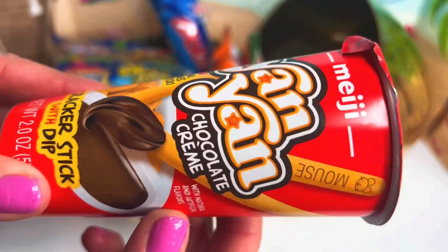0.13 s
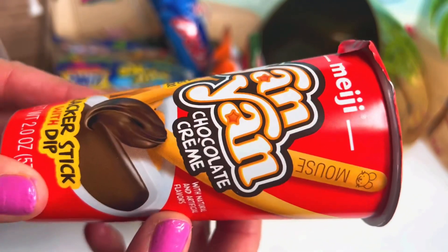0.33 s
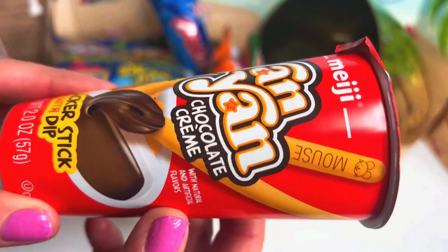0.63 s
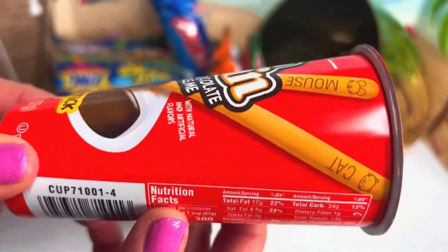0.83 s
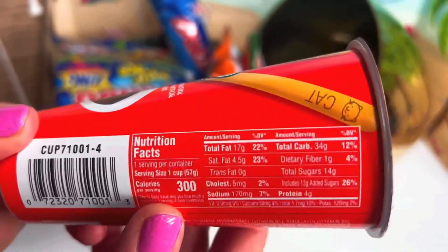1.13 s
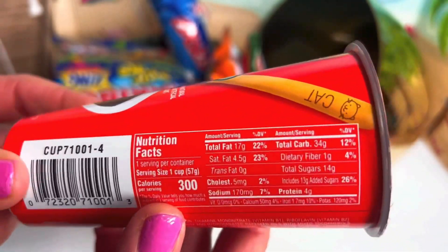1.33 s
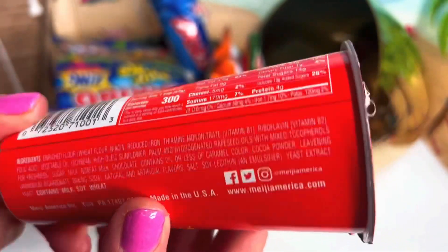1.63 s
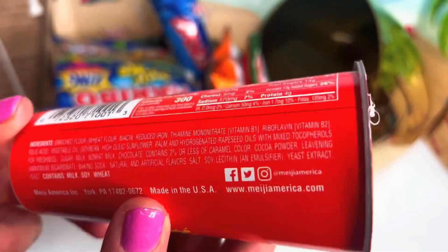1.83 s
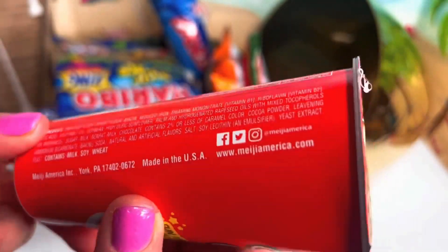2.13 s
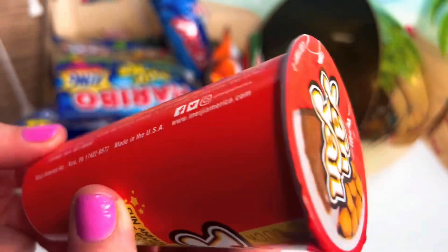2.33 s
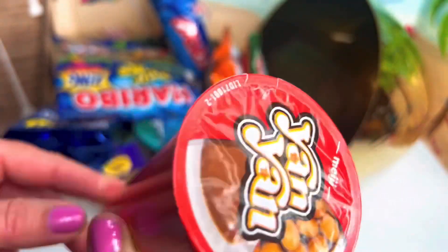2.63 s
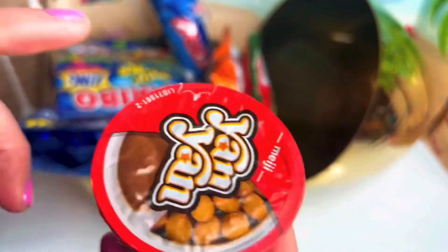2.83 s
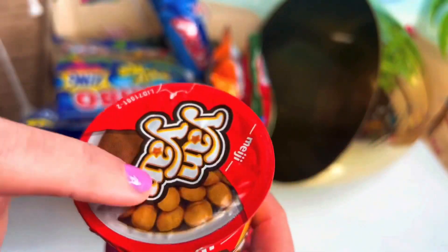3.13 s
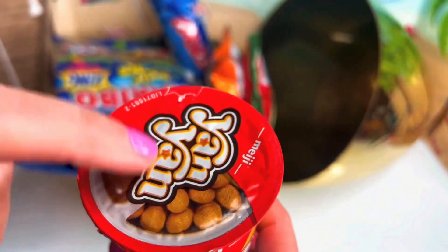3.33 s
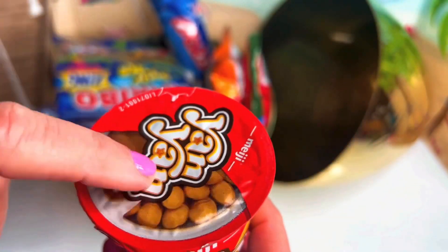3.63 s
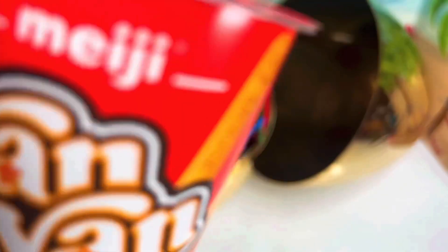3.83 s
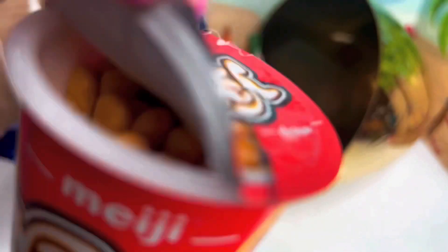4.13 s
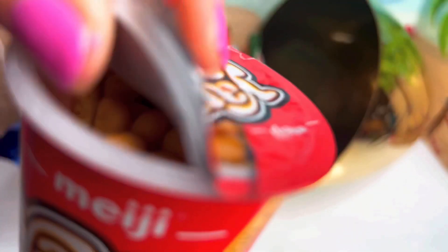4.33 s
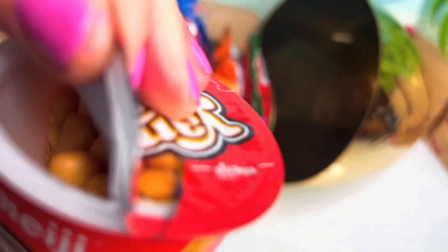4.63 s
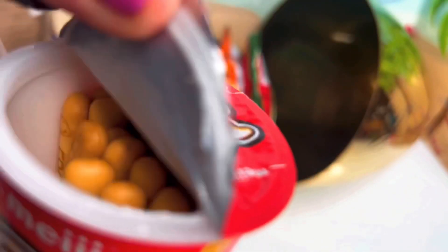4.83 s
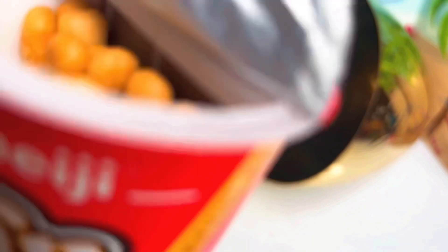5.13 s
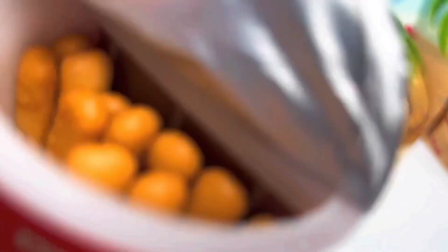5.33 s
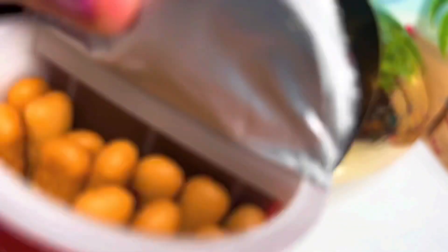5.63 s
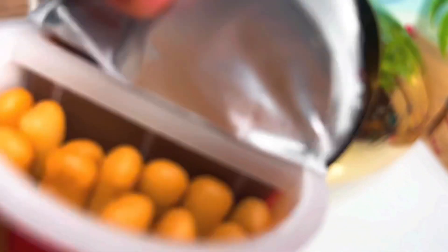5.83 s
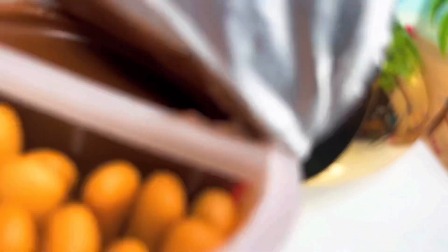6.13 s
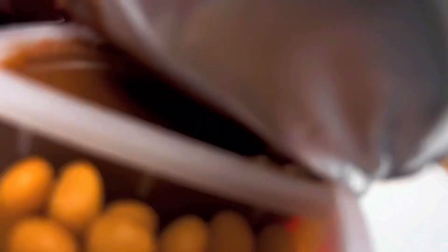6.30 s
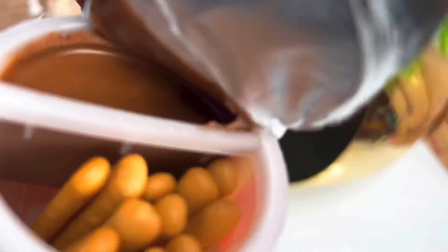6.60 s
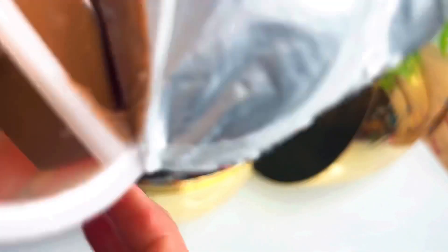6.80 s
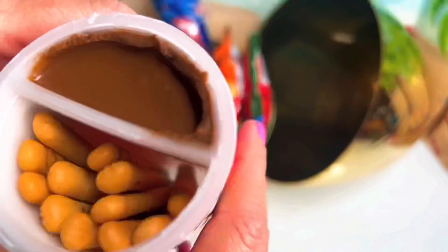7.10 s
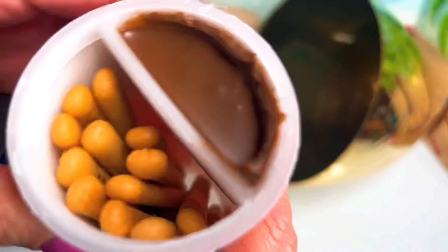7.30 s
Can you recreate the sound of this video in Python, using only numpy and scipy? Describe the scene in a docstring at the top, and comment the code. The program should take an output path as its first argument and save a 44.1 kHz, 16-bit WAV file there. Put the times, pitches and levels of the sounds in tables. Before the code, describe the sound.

Close handling of a small plastic cup: dry skin rubs, a nail tap on foil, then crackly peeling and a loud foil crumple.

```python
"""Fingers turn a lidded plastic snack cup close to a pair of microphones, over a faint low room rumble.
First skin rubs on the cup in dense grains of noise, with snaps made of short noise bursts.
From about 3.1 s a nail taps the foil lid: snaps, low thumps, dying tones and a wash of noise.
From 3.8 s the lid is peeled back and the cup's colour shifts; dense clicks around one pitch come in short bursts.
Around 5.9 s the foil is crumpled loudest; strokes and snaps go on, then thin out after about 7.1 s."""
import sys
import numpy as np
from scipy import signal
from scipy.fft import rfft, irfft, next_fast_len
from scipy.io import wavfile

SR = 44100
rng = np.random.default_rng(int(sys.argv[2]) if len(sys.argv) > 2 else 0)


def wrap_up_sound(samples):
    """Save the sound to the file named by the first command line argument, as 16-bit audio."""
    columns = np.atleast_2d(samples).T
    # keep every value between -1 and 1, then stretch to whole-number steps
    tamed = np.clip(columns, -1, 1)
    steps = np.round(tamed * 32767).astype(np.int16)
    wavfile.write(sys.argv[1], SR, steps)


N = 328986   # length in samples


def amp(db):
    """Turn decibels into a gain."""
    return 10 ** (np.asarray(db) / 20)


def rms_one(x):
    """Scale a signal to an average (rms) strength of 1."""
    return x / np.sqrt(np.mean(x ** 2) + 1e-20)


def in_time(rows):
    """Draw straight lines through (start_s, level_db) points, giving a level for every sample."""
    s, level_db = np.transpose(rows)
    return np.interp(np.arange(N) / SR, s, level_db)


def band(x, low_hz, high_hz, order=2):
    """Keep only the pitches between two limits (Butterworth band-pass)."""
    limits = [low_hz, min(high_hz, .45 * SR)]
    return signal.sosfilt(signal.butter(order, limits, "band", fs=SR, output="sos"), x)


def resonate(x, hz, width_hz):
    """Ring at one pitch, as a two-pole resonance with a gain of 1 at its top; a narrow one rings longer."""
    r = np.exp(-np.pi * width_hz / SR)
    top = np.array([1, 0, -1]) * (1 - r * r) / 2
    return signal.lfilter(top, [1, -2 * r * np.cos(2 * np.pi * hz / SR), r * r], x)


def fade(clicks, t60):
    """Turn each click into a sudden rise and an exponential fall of 60 dB in t60 seconds."""
    return signal.lfilter([1], [1, -amp(-60 / (t60 * SR))], clicks + 1e-18)


def drift(rate):
    """Make a slowly wandering random curve of rms 1; a higher rate (Hz) wanders faster."""
    r = np.exp(-2 * np.pi * rate / SR)
    wander = signal.lfilter([1], [1, -2 * r, r * r], rng.standard_normal(N + SR))
    return rms_one(wander[SR:])   # the first second lets the filter settle


# colour of the room rumble, only its shape counts: pitch_hz [Hz], level_db [dB per Hz]
ROOM_COLOUR = [(15, -49), (25, -14), (124, 20), (288, -10.5), (541, -8), (900, -28), (1170, -55.5)]
RUMBLE_DB = -72   # rms over both channels


def room_tone(likeness):
    """The room rumbles steadily: shaped noise, mostly shared by both microphones."""
    pitch_hz, level_db = np.transpose(ROOM_COLOUR)
    log_hz = np.log(np.fft.rfftfreq(N, 1 / SR) + 1)
    gain = amp(np.interp(log_hz, np.log(pitch_hz), level_db))
    mid, side = irfft(rfft(rng.standard_normal((2, N))) * gain, N)
    alike = np.clip(likeness, 0, 1)
    rumble = np.sqrt(1 + alike) * mid + np.sqrt(1 - alike) * side * [[1], [-1]]
    return amp(RUMBLE_DB) * rms_one(rumble)


ROOM_T60_S = 0.12   # fall of the lowest pitches; higher ones die sooner


def room(x):
    """The room answers through eight feedback delays a side, duller on every round."""
    size = next_fast_len(N + SR)   # spare room at the end for the echoes
    hz = np.fft.rfftfreq(size, 1 / SR)
    spectrum, out = rfft(x, size), np.zeros((2, len(hz)), complex)
    for k, lag in enumerate(rng.uniform(.006, 0.022, 16)):
        dull_hz = 30.8 / lag   # a longer path loses more treble per round
        round_trip = amp(-60 * lag / ROOM_T60_S) * np.exp(-2j * np.pi * hz * lag)
        loop = round_trip / (1 + 1j * hz / dull_hz)
        out[k % 2] += loop / (1 - loop) * (-1) ** (k // 2)
    return irfft(out * spectrum, size)[:, :N]


# difference between the two microphone ports:
# pitch_hz [Hz], left_minus_right_db [dB], left_lead_rad [radians]
PORT_OFFSETS = [(150, 2.5, .4), (900, 5.5, .4), (1300, 7.5, -.8), (2300, 6.5, -.3), (3100, 2.5, .8),
                (6000, 3.5, .2), (7300, 6, .8), (8400, 0, .2), (15300, 0, -12.5)]


def ports(x):
    """A near source reaches the two microphone ports with level and phase offsets that depend on pitch."""
    size = next_fast_len(N + SR // 10)
    hz = np.fft.rfftfreq(size, 1 / SR)
    pitch_hz, balance_db, lead_rad = np.transpose(PORT_OFFSETS)
    balance = amp(np.interp(hz, pitch_hz, balance_db) / 2)
    half = balance * np.exp(.5j * np.interp(hz, pitch_hz, lead_rad))
    return irfft(rfft(x, size) * np.array([half, 1 / half]), size)[:, :N]


# low noise of the hands, before it wavers and reaches the ports: start_s [s], level_db [dB]
HAND_LEVELS = [(0.0, -72), (2.51, -78), (6.71, -59.5), (7.46, -81)]


def hand_rumble():
    """The moving hands make a low noise whose level wavers."""
    level_db = in_time(HAND_LEVELS) + 2 * drift(6.6)
    return amp(level_db) * rms_one(band(rng.standard_normal(N), 50, 200))


def widening_copy(x):
    """A faint copy 1.2 ms late, drifting in strength and opposite in the two channels, widens the sound."""
    late = np.roll(band(x, 250, 4600), round(0.001213 * SR), axis=1)
    return amp(-6.0) * drift(10.4) * late * [[1], [-1]]


# grips and pushes on the cup, levels relative:
# start_s [s, at the height of the swing], level_db [dB], pitch_hz [Hz, once it has sagged]
GRIPS = [(3.105, -46, 116.6), (3.353, -51, 149.3), (3.62, -41.5, 181), (3.633, -48, 87.7),
         (5.291, -48, 231), (5.383, -49.5, 76.4), (5.403, -50.5, 78.3), (5.438, -50.5, 244),
         (5.456, -39, 161.4), (5.474, -45.5, 137), (5.495, -41.5, 218.7), (5.543, -52, 297),
         (5.555, -52, 134), (5.617, -49.5, 347), (5.8, -43, 316), (5.897, -32, 306), (5.926, -41, 68),
         (5.943, -44, 420), (5.957, -56, 98.6), (6.273, -52.5, 64.6), (6.353, -49, 72.8),
         (6.658, -35.5, 198), (6.892, -50.5, 113.4)]


def thumps():
    """The held cup answers a push with a few low cycles; flesh loads it slowly and the pitch sags."""
    out = np.zeros(N)
    for s, level_db, hz in GRIPS:
        rise_s = 0.0034 + 0.5 / hz
        i = round((s - rise_s) * SR)
        t = np.arange(SR // 6) / SR / rise_s   # time counted in rises
        turns = hz * rise_s * (t + 0.21 * (1 - np.exp(-t)))   # starts 21 % sharp
        swing = np.sin(2 * np.pi * turns) * (t * np.exp(1 - t)) ** 2
        out[i:i + len(t)] += amp(level_db + 6.0) * swing[:N - i]
    scuff = rms_one(band(rng.standard_normal(N), 83, 450))   # skin shudders on the wall under load
    return out * (1 + 0.28 * scuff)


# pitch ranges of whatever excites the cup: low_hz [Hz], high_hz [Hz], level_db [dB, relative],
# treble_follow [dB gained per dB of treble share], snap_fall_s [s to fall 60 dB]
RANGES = [(1150, 2540, -0.5, -0.27, 0.02), (2778, 5500, 0, 0.47, 0.022), (6060, 10900, -1.5, 0.92, 0.0092),
          (10200, 13000, -3, 0.93, 0.011)]
# peaks in the cup's colour with its lid on, the widest just brightening the top treble: # pitch_hz [Hz],
# width_hz [Hz], level_db [dB, of the ring added on top of the plain sound]
SEALED_PEAKS = [(773, 98, 1.5), (1620, 500, -4.5), (3390, 110, -0.5), (15000, 1200, 2.5)]
# peaks in the colour once the lid is open, the one near 15 kHz just brightening the top treble: # pitch_hz
# [Hz], width_hz [Hz], level_db [dB, of the ring added on top of the plain sound]
OPEN_PEAKS = [(523, 71, 1), (609, 87, 6.5), (2020, 140, -4), (2986, 530, 0.5), (8170, 680, -4),
              (11900, 330, 0.5), (14900, 870, 12.5)]
OPENING_S = 3.8   # when the lid is opened


def cup(boom, ranges):
    """The cup colours what excites it with resonant peaks, a different set once the lid is open."""
    x = band(boom, 200, 868)
    x += sum(band(part, row[0], row[1]) for part, row in zip(ranges, RANGES))
    opened = np.arange(N) > OPENING_S * SR
    out = x.copy()
    for peaks, part in ((SEALED_PEAKS, x * ~opened), (OPEN_PEAKS, x * opened)):
        for hz, width_hz, level_db in peaks:
            out += amp(level_db) * resonate(part + 1e-18, hz, width_hz)
    return out


# wash after each tap on the lid, levels relative: start_s [s], level_db [dB]
TAP_WASHES = [(3.095, -38), (3.345, -58), (3.614, -52)]
TAIL_BASS_T60_S, TAIL_TREBLE_T60_S = 0.35, 0.28
TAIL_TILT_DB = -4.5   # per range upward


def tap_tails():
    """After a tap on the lid a smooth wash dies away in cup and room, the treble first."""
    s, level_db = np.transpose(TAP_WASHES)
    clicks = np.zeros(N)
    clicks[np.round(s * SR).astype(int)] = amp(level_db)
    t60s = np.geomspace(TAIL_BASS_T60_S, TAIL_TREBLE_T60_S, 1 + len(RANGES))
    parts = []
    for k, t60 in enumerate(t60s):
        parts.append(amp(TAIL_TILT_DB * k) * fade(clicks, t60) * rng.standard_normal(N))
    return cup(parts[0], parts[1:])


# hollow knocks that leave the air in the cup ringing:
# start_s [s], level_db [dB, at the start], pitch_hz [Hz], fall_s [s to fall 60 dB]
AIR_KNOCKS = [(2.794, -46.5, 748, 0.11), (2.82, -38, 760, 0.024), (2.846, -41.5, 713, 0.027),
              (3.0932, -19.5, 880, 0.015), (3.0917, -22.5, 1834, 0.013), (3.611, -33.5, 876, 0.032),
              (4.085, -48.5, 490, 0.083), (4.291, -50.5, 564, 0.15), (5.605, -33.5, 955, 0.026),
              (7.037, -38, 577, 0.045), (7.116, -37.5, 630, 0.041)]


def knocks():
    """Each knock is one dying tone of the cup's air."""
    out, t = np.zeros(N), np.arange(SR // 5) / SR
    for s, level_db, hz, fall_s in AIR_KNOCKS:
        i = round(s * SR)
        tone = amp(level_db - 60 * t / fall_s) * np.sin(2 * np.pi * hz * t)
        out[i:i + len(t)] += tone[:N - i]
    return out


# short bursts of dense clicks around one pitch, some from taps or the cup's body:
# start_s [s], length_s [s], level_db [dB], pitch_hz [Hz]
CLICK_BURSTS = [(3.61, 0.0068, -41.5, 3350), (3.857, 0.13, -69.5, 430), (4.094, 0.036, -48, 3650),
                (5.311, 0.037, -60, 3560), (5.321, 0.037, -61, 1550), (5.434, 0.03, -59, 930),
                (5.918, 0.0063, -30, 1480), (6.081, 0.052, -48.5, 2080), (6.655, 0.047, -45, 2400),
                (6.759, 0.05, -40, 2110), (6.878, 0.065, -44, 2550), (6.924, 0.062, -50.5, 2580)]
BURST_CLICKS_PER_S, BURST_CYCLES = 1100, 3.85   # more cycles make a purer ring


def click_bursts():
    """Dense clicks of uneven size swell and die while they ring around one pitch."""
    out, t = np.zeros(N), np.arange(SR // 8) / SR
    for s, length_s, level_db, hz in CLICK_BURSTS:
        clicks = (rng.random(len(t)) < BURST_CLICKS_PER_S / SR) * rng.laplace(size=len(t))
        clicks = clicks * np.sin(np.pi * np.minimum(t / length_s, 1))
        ring = resonate(clicks, hz, hz / BURST_CYCLES)
        ring = resonate(ring, hz, 2 * hz / BURST_CYCLES)
        strength = np.sqrt(np.sum(ring ** 2) / (length_s * SR))
        i = round(s * SR)
        out[i:i + len(t)] += amp(level_db) * ring / strength
    return out


# snaps, ticks and taps, levels relative:
# start_s [s], level_db [dB], treble_db [dB, treble share], boom_db [dB, share of the cup's boom]
SNAP_HITS = [(0.0695, -31, -5, -15), (0.7034, -39, -3, -3.5), (0.721, -25, -10, -11.5),
             (0.742, -38.5, -21, 2), (0.766, -36.5, -27, -3), (0.7906, -28.5, -9.5, -5.5),
             (0.8244, -42, -3, 7), (0.853, -48, -15, 8), (0.893, -50, -23, -1), (0.921, -40, -7, 2),
             (1.176, -36, -4.5, 2), (1.199, -42.5, -1, 0), (1.532, -51.5, -16, 8), (1.567, -38, -6, -4),
             (1.596, -31.5, -9, -0.5), (1.6235, -40.5, -7, 0), (1.653, -41.5, -14, -15),
             (1.6694, -46.5, -44, -10), (1.8335, -36, -7, -3.5), (1.8537, -46.5, -9, -8),
             (1.884, -41.5, -7, -16), (1.9158, -42, -5, -2), (1.969, -46, -28, 0.5), (2.135, -43, -20, -2),
             (2.1686, -52, -15, -5), (2.7942, -55, -2, 10), (3.0185, -58.5, -4.5, 7),
             (3.093, -26, -0.5, -19), (3.162, -34.5, -9.5, -20), (3.342, -45.5, 3, 15),
             (3.3554, -46.5, -12, 1), (3.611, -33, -2, 6), (3.84, -53, 6, -14), (4.1092, -42.5, -2.5, -16),
             (4.247, -57, 14.5, -4), (4.2896, -43, -17, -2), (4.471, -61, -20, 0.5), (4.68, -37, 9, -1.5),
             (4.69, -47.5, 14, -1), (4.722, -36, -6.5, 1), (4.829, -39.5, 15.5, -7), (4.8659, -42, 4, 3),
             (4.8829, -40.5, 1, -8), (4.8934, -42.5, -1, -20), (5.025, -52, -1, 1.5),
             (5.163, -50, -7, -7.5), (5.2077, -46.5, -21, -29), (5.3447, -42, -2, 2),
             (5.4876, -43.5, -5.5, -25), (5.5752, -43.5, -4.5, -7), (5.6026, -40.5, 0, 3.5),
             (5.706, -47, -8, 2), (5.7721, -44.5, -23, 0), (5.7927, -38, -7, -5), (5.892, -24.5, 4.5, -3.5),
             (5.9043, -30.5, 9.5, -20), (5.9209, -23.5, -30, -5), (5.933, -33, 3, 2), (5.9407, -22, -1, -5),
             (5.969, -47, 17, 6), (6.0454, -44, -7, -21), (6.076, -39.5, 1.5, 4), (6.0874, -36.5, 5.5, 0),
             (6.112, -35.5, -0.5, -19), (6.3801, -48, -27, 16), (6.4792, -33.5, -17, -13),
             (6.583, -48, -17, -6), (6.6282, -52, 14, -18), (6.6484, -40.5, 15.5, -0.5),
             (6.6778, -39, 5, 2), (6.767, -35, 3, 4), (6.785, -31.5, 13, 2.5), (6.865, -36, 7, -15),
             (6.904, -39, 16, 6), (7.036, -39, -3.5, -1), (7.1165, -30, -3, -9), (7.408, -63.5, -9, 12.5),
             (7.423, -50.5, -4, 2.5)]


def snaps():
    """A snap is a burst of jolts; the highest treble dies before the cup's boom, and a softer flutter follows."""
    s, level_db, treble_db, boom_db = np.transpose(SNAP_HITS)
    at = np.round(s * SR).astype(int)
    shares = [(boom_db + 3.5, .026)]   # (share in dB, fall in s), boom first
    for _, _, range_db, treble_follow, fall_s in RANGES:
        shares.append((range_db + treble_follow * treble_db, fall_s))
    parts = []
    for share_db, fall_s in shares:
        clicks = np.zeros(N)
        clicks[at] = amp(level_db + share_db + 11)
        burst = fade(fade(clicks, fall_s) * 0.056, 0.0011)   # the second fade softens the start
        flutter = amp(-26.5) * fade(clicks, 0.071)
        parts.append((burst + flutter) * rng.choice([-1, 1], N))
    return cup(parts[0], parts[1:])


def creases(clicks, cycles):
    """Each click rings one small patch of wall or foil, of chance size, for a few cycles."""
    pitches = np.geomspace(500, 4200, 16)   # Hz
    dealt = rng.integers(0, 16, N)
    return sum(resonate(clicks * (dealt == k) + 1e-18, hz, hz / cycles) for k, hz in enumerate(pitches))


# strokes of skin on the cup and crinkles of the foil, levels relative:
# start_s [s, at full strength], swell_s [s], hold_s [s], fade_s [s], level_db [dB],
# treble_db [dB, treble share], boom_db [dB, share of the cup's boom]
HAND_STROKES = [(0.063, 0.22, 0.033, 0.14, -53, -10.5, 1), (0.712, 0.089, 0.19, 0.077, -55.5, -4, 2),
                (1.106, 0.087, 0.031, 0.055, -63.5, -5, 5.5), (1.174, 0.012, 0.015, 0.11, -56, -6, 6.5),
                (1.55, 0.063, .11, 0.063, -51.5, -10.5, -0.5), (1.776, 0.19, 0.23, 0.17, -64.5, -26, 3),
                (2.142, 0.15, 0.051, 0.052, -53.5, -7, -1), (2.398, 0.22, 0.12, 0.26, -79.5, 8, -9),
                (2.798, 0.027, 0.043, 0.11, -62.5, -5.5, 4.5), (3.366, 0.024, 0.002, 0.079, -62.5, -10, 7),
                (3.636, 0.029, 0.0045, 0.069, -54.5, -5.5, 7), (3.703, 0.041, 0.03, 0.08, -66.5, -3, 2.5),
                (3.806, 0.016, 0.012, 0.21, -69.5, 4, 9.5), (3.97, 0.041, 0.051, 0.017, -67.5, 0.5, 0),
                (4.073, 0.046, 0.039, 0.15, -64.5, -0.5, 2.5), (4.226, 0.043, 0.044, 0.027, -65.5, 8.5, -2),
                (4.353, 0.15, 0.033, 0.05, -77.5, 10, 3), (4.688, 0.053, 0.0082, 0.1, -70, 5, 5),
                (4.868, 0.014, 0.02, 0.12, -56.5, -12, 2), (5.283, 0.013, 0.084, 0.28, -62, 4, -13),
                (5.434, 0.044, 0.26, 0.079, -66, 0, 0), (5.814, 0.067, 0.025, 0.063, -67, 0, 9.5),
                (5.902, 0.021, 0.037, 0.092, -37.5, -3.5, 2.5), (6.082, 0.089, 0.051, 0.088, -53, 2.5, 7),
                (6.219, 0.0057, 0.16, 0.12, -61.5, 1, 4), (6.493, 0.12, 0.02, 0.6, -58, 0.5, 4),
                (6.656, 0.064, 0.031, 0.016, -45, 1.5, -8), (6.769, 0.041, 0.02, 0.072, -42.5, 1.5, 0),
                (6.863, 0.044, 0.055, 0.071, -41, 0, 1), (7.027, 0.096, 0.008, 0.059, -61, -3.5, -3),
                (7.111, 0.0022, 0.013, 0.0077, -48, -4.5, -24), (7.14, 0.016, 0.02, 0.18, -80.5, 18, -13),
                (7.291, 0.07, 0.036, 0.085, -74.5, 17, 3.5)]
STROKE_SPAN_DB = 30    # gained in one swell time, lost in one fade time
SHEEN_FOLLOWS = 0.76   # dB of sheen share per dB of treble share
# light, airy glide of the fingers between the strokes, levels relative: start_s [s], level_db [dB]
FINGER_GLIDE = [(0.36, -107), (0.39, -81), (0.59, -103), (0.62, -74.5), (0.95, -71), (1.05, -100),
                (1.37, -103), (1.42, -75), (2.55, -88), (2.625, -72.5), (2.69, -106), (2.95, -100),
                (3.1, -106), (3.75, -100), (4.3, -95), (4.51, -78.5), (4.63, -93.5), (4.8, -72.5),
                (4.98, -88), (5.2, -82), (7.08, -88), (7.24, -100), (7.37, -75), (7.42, -67.5)]
GLIDE_SHEEN_DB, GLIDE_TREBLE_DB, GLIDE_BOOM_DB = 8.5, 4.5, -1   # shares


def contact():
    """Strokes swell, hold and fade over the glide; gives level, then sheen, treble and boom shares, in dB."""
    t = np.arange(N) / SR
    glide_shares_db = np.array([[0], [GLIDE_SHEEN_DB], [GLIDE_TREBLE_DB], [GLIDE_BOOM_DB]])
    power = amp(2 * (in_time(FINGER_GLIDE) + glide_shares_db))   # doubled dB give power
    for s, swell_s, hold_s, fade_s, level_db, treble_db, boom_db in HAND_STROKES:
        first = max(round((s - 2 * swell_s) * SR), 0)
        on = slice(first, round((s + hold_s + 2 * fade_s) * SR))
        away = np.maximum((s - t[on]) / swell_s, (t[on] - s - hold_s) / fade_s)
        shares_db = [[0], [SHEEN_FOLLOWS * treble_db], [treble_db], [boom_db]]
        power[:, on] += amp(2 * (level_db - STROKE_SPAN_DB * np.maximum(away, 0) + shares_db))
    total_db, *parts_db = 10 * np.log10(power)
    return total_db, *(part_db - total_db for part_db in parts_db)


def rubbing(per_s, spread_db, clump_db, smooth_db, crease_db):
    """Tiny slips of uneven size, each a few milliseconds of noise, come in clumps over a smooth slide."""
    level_db, sheen_db, treble_db, boom_db = contact()
    born = rng.random(N) < per_s * amp(clump_db * drift(25)) / SR
    slips = born * amp(spread_db * np.minimum(rng.exponential(1, N), 3))
    grip = np.clip((level_db + 78.5) / 18, 0, 1)   # a light touch glides, a firm one sticks and slips
    opening = round(OPENING_S * SR)
    grip[opening:] = np.maximum(grip[opening:], .6)   # loose foil crinkles at any touch
    grain = rms_one(rms_one(fade(slips, 0.014)) + amp(smooth_db))
    roughness = 1 + grip * (grain - 1)
    noise = [roughness * amp(2.22 * drift(49)) * rng.standard_normal(N) for _ in range(5)]
    shares_db = (9, sheen_db + 5, treble_db + 4.0, treble_db - 1.5)
    ranges = [part * amp(level_db + share_db) for part, share_db in zip(noise[1:], shares_db)]
    boom = noise[0] * amp(level_db + boom_db + 8.5)
    crackle = grip * amp(level_db + crease_db) * rms_one(creases(slips, cycles=8.5))
    return cup(boom, ranges) + crackle


def scene():
    """Hands, cup and foil sound near the microphones, the sounding spot wandering over the cup, in the room."""
    near = rubbing(per_s=400, spread_db=3.5, clump_db=3.0, smooth_db=-4.0, crease_db=-2.0)
    near += snaps() + thumps() + knocks() + click_bursts() + tap_tails()
    direct = ports(near)
    spot = amp(0.99 * drift(25) * [[1], [-1]])   # one side gains what the other loses, in dB
    close = direct * spot + widening_copy(direct) + ports(hand_rumble())
    return close + amp(-16.5) * room(near) + room_tone(likeness=0.91)


def record(dry):
    """A steep filter cuts the top: from 17.1 kHz up everything is at least 60 dB down."""
    return signal.sosfilt(signal.cheby2(14, 60, 17100, fs=SR, output="sos"), dry)


dry = scene()
out = record(dry)
wrap_up_sound(out)
```